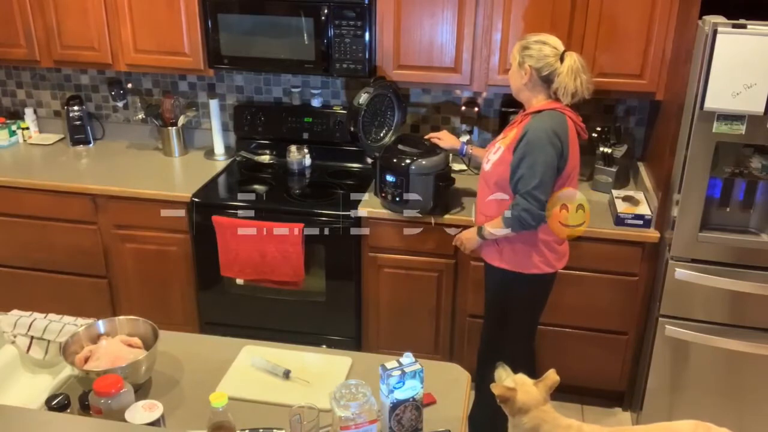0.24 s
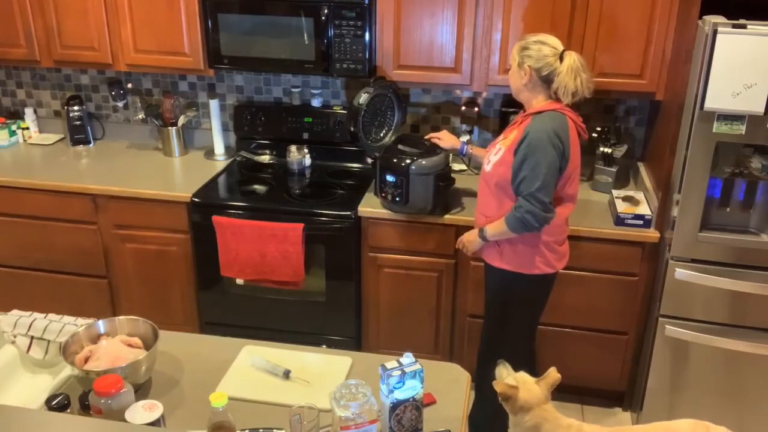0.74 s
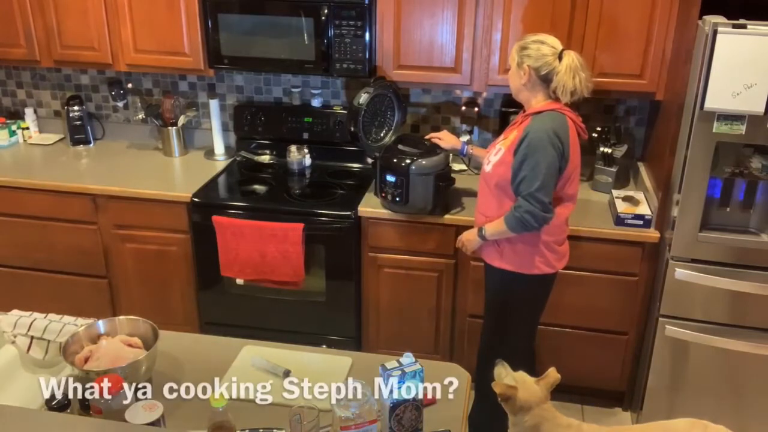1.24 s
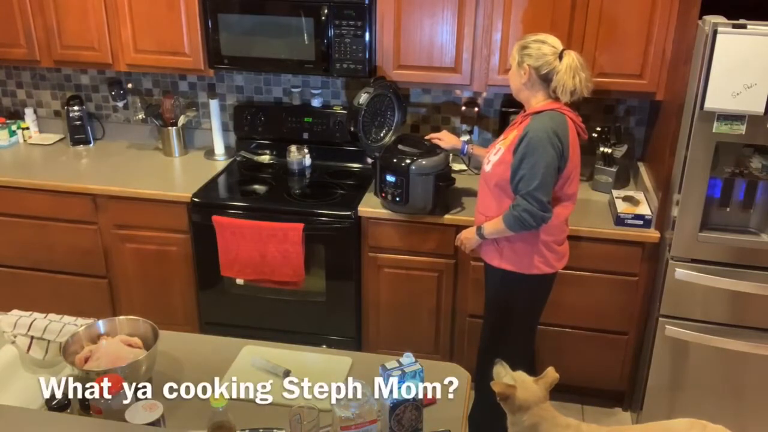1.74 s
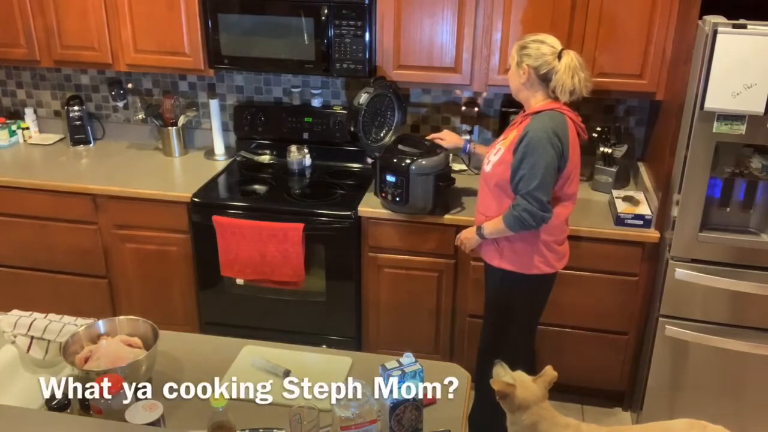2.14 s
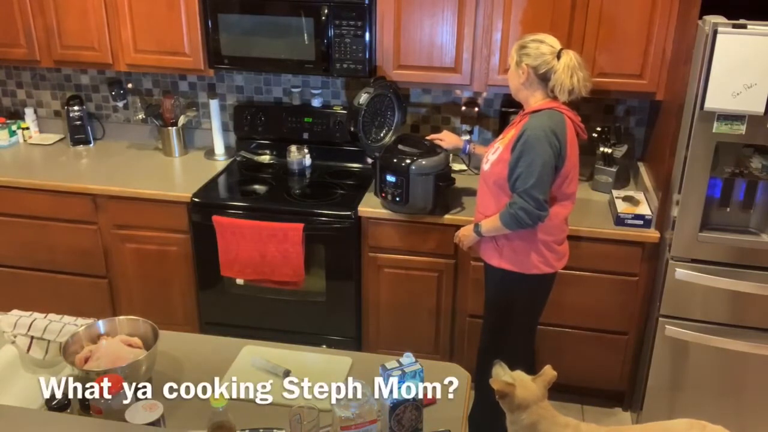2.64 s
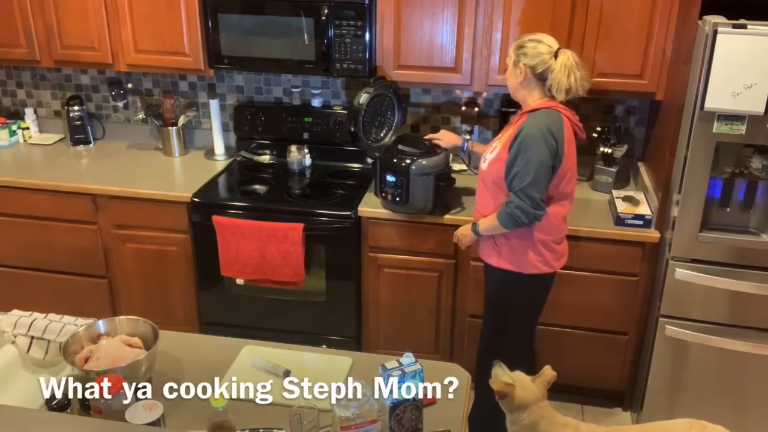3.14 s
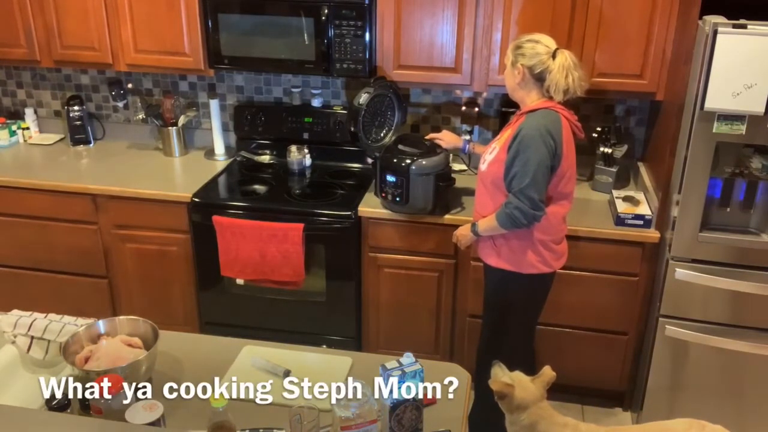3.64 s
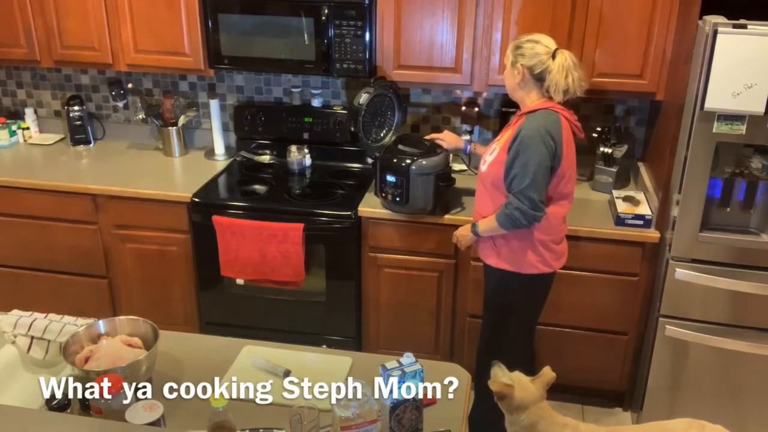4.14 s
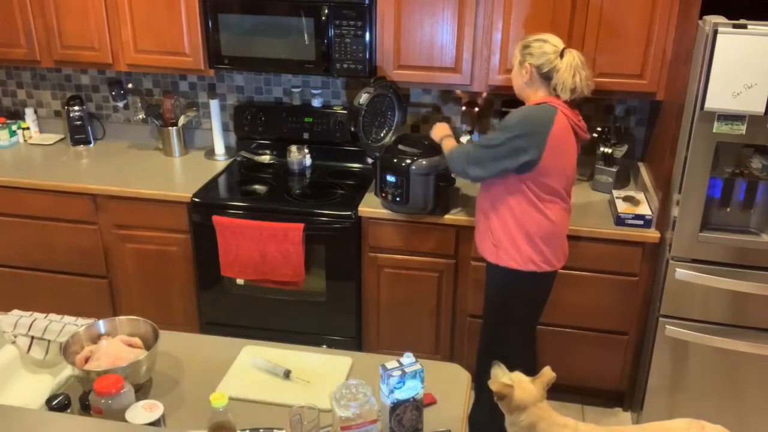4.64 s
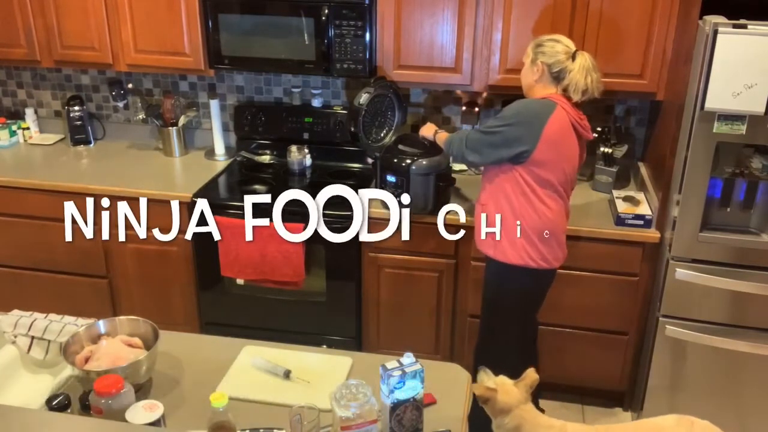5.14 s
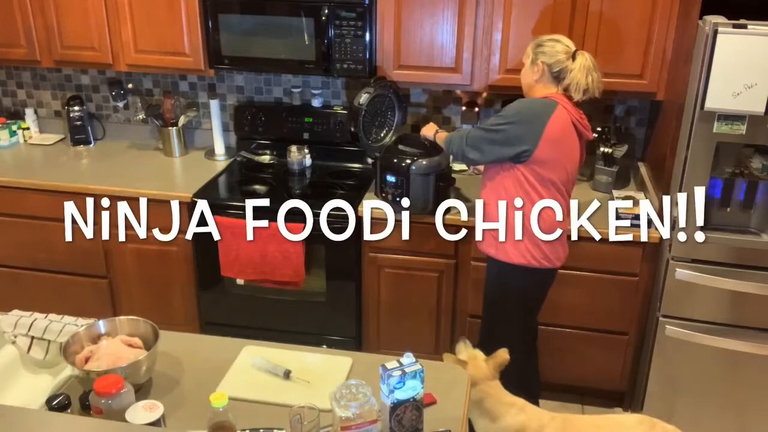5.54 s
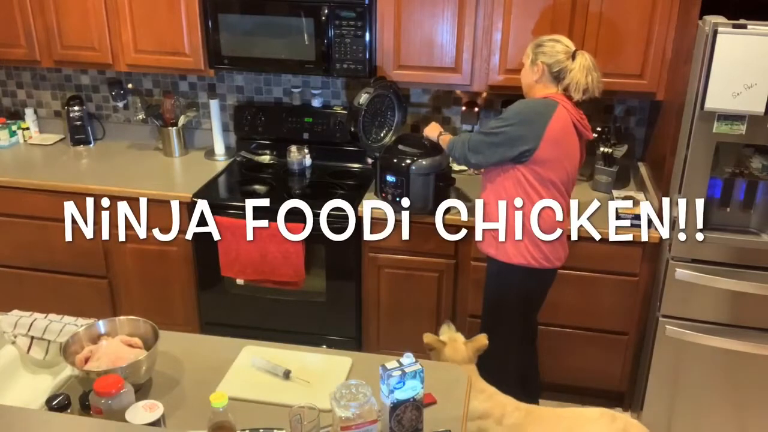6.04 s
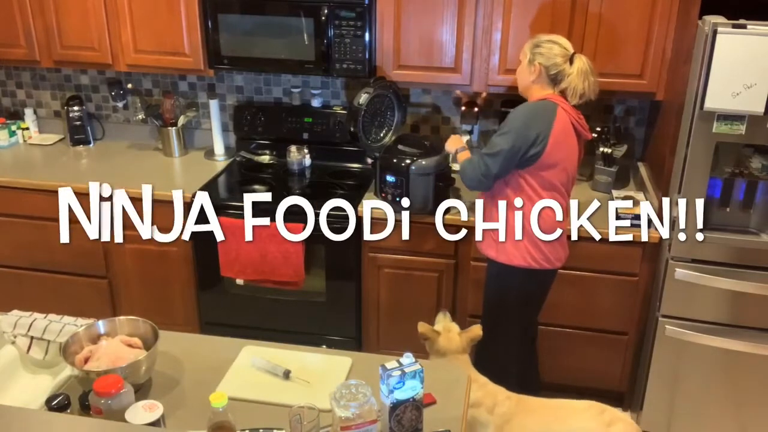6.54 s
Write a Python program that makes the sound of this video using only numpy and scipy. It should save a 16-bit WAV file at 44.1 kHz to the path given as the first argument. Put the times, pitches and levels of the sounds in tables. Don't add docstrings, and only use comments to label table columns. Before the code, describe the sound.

Steam jets from a cooker's valve in uneven bursts: one long, one short and strong, one weak puff, one firm and abruptly ended, then a pause and another long rush. The hiss is sharp, spitting and slightly whistling, with short echoes off tiles and cupboards. Faint low refrigerator hum fills the gaps, with soft foot thumps and cloth rustle; light paw knocks sit under the final burst. Heard from across the room by one microphone.

```python
import sys
import numpy as np
from scipy import signal
from scipy.fft import rfft, irfft, next_fast_len
from scipy.io import wavfile
from scipy.ndimage import uniform_filter1d, map_coordinates

SR = 44100
rng = np.random.default_rng(int(sys.argv[2]) if len(sys.argv) > 2 else 0)


def makeup_ratio(level_db):
    decades = np.asarray(level_db, float) / 20
    return 10 ** decades


def put_to_file(sound):
    columns = np.atleast_2d(sound).T
    safe = np.clip(columns, -1, 1)
    whole_steps = np.round(safe * 32767)
    wavfile.write(sys.argv[1], SR, whole_steps.astype(np.int16))


N = 298821
LEAD = SR // 2
TIME = np.arange(-LEAD, N) / SR

# start in seconds, opening time in seconds,
# held time in seconds, closing time in seconds, hiss level in dB.
PUSHES = [
    (-0.5, 0.062, 2.058, 0.037, -22),
    (1.966, 0.097, 0.19, .15, -20.5),
    (2.74, 0.059, 0.081, 0.069, -36.5),
    (3.203, .21, 0.68, 0.017, -23),
    (4.908, 0.041, .02, 0.34, -41),
    (5.189, 0.056, 1.6, .03, -23.5),
]
# time in seconds, extra flow in dB,
# throat song in dB relative to the hiss, throat pitch in Hz.
FINGER_LEAN = [(0, -0.5, -13, 2165), (.82, 0, -12.5, 2120), (.866, 1, -10, 2200), (.97, -1.9, -13, 2160),
               (1.33, -0.7, -17, 2060), (1.62, -1, -12.5, 2150), (2.05, -2.3, -10.5, 2270),
               (2.24, -0.8, -8.5, 2260), (3.6, 0, -12.5, 2250), (3.75, 1, -19.5, 1950),
               (4.02, 0.1, -16, 1940), (4.1, 1.8, -10.5, 2280), (5.15, -2.5, -10, 2230),
               (5.24, 3.5, -9.5, 2140), (5.31, -0.5, -12.5, 2090), (5.62, 0.3, -16.5, 2040),
               (5.9, 0, -13, 2250), (6.78, -1.1, -14, 2300)]
# frequency in Hz, level in dB per Hz.
HISS_COLOUR = [(1650, -34), (2800, -16.5), (3010, -12.5), (3480, -14.5), (4110, -15.5), (4970, -10),
               (6110, -1.5), (7210, -1), (9080, -0.5), (9860, -1), (11500, -11.5), (15000, -29.5),
               (22000, -120)]
# frequency in Hz, level in dB per Hz.
FIZZ_COLOUR = [(10000, -45), (11300, 14.5), (12400, 5.5), (13700, 14.5), (14800, 11.5), (15800, 14.5),
               (17000, -8.5)]
# frequency in Hz, level in dB per Hz.
LID_COLOUR = [(150, -53.5), (500, -21), (800, -4.5), (1000, -19), (1140, -15.5), (1250, 7), (1400, 1),
              (1600, -4.5), (2000, -18), (3000, -81.5)]
# frequency in Hz, width in Hz, lift in dB.
STANDING_WAVES = [(1242, 58, 6.5), (1540, 140, -6), (2045, 136, 3), (2320, 130, 2.5), (2567, 37, 7),
                  (2750, 130, -1.5), (3010, 70, 3.5), (4977, 160, 6), (5480, 91, 7), (5620, 130, -4),
                  (6354, 90, 7.5), (6480, 40, -1.5), (7035, 78, 9.5), (7520, 70, 5), (7400, 68, -2),
                  (7540, 45, 1), (8550, 43, -4), (9360, 30, 1.5), (9180, 300, -4.5), (9660, 120, 2),
                  (10040, 45, -1), (10360, 80, 0.5), (10290, 47.6, 7), (10660, 50, 8), (10820, 58, -1.5),
                  (12240, 65, 13.5), (12620, 207, -2), (13750, 85, 2), (14800, 100, 2.5)]
# frequency in Hz, time to fall by 60 dB in seconds.
ROOM_RING = [(1000, 0.58), (2200, 0.71), (4000, 0.58), (6500, 0.52), (10000, 0.35), (15000, 0.26)]
# frequency in Hz, rms level in dB.
HUM_TONES = [(120.0, -48), (240, -64), (300, -63.5), (360, -56.5), (420, -59.5), (480, -66), (660, -63.5),
             (900, -76.5), (1080, -70)]
# frequency in Hz, width in Hz, rms level in dB.
MOTOR_TONES = [(40, 18, -63.5), (194, 39, -60.5), (219.3, 7.9, -62.5), (344, 14, -73), (577, 17, -67)]
# frequency in Hz, level in dB per Hz.
AIR_COLOUR = [(20, -22.5), (30, -16), (60, -10), (95, -13.5), (150, -14.5), (230, -9.5), (420, -9),
              (680, -15.5), (900, -16.5), (2200, -26), (5000, -35), (7500, -41.5), (10300, -45),
              (11600, -56)]
# time in seconds, peak level in dB, brightest frequency in Hz, spread in Hz.
PAW_TAPS = [(5.626, -36, 760, 500), (5.64, -31.5, 450, 900), (5.701, -40, 600, 600), (5.739, -44, 250, 300),
            (5.855, -36.5, 483, 500), (5.895, -39, 400, 300), (5.966, -41, 260, 350),
            (5.995, -39, 400, 300), (5.92, -44, 400, 300), (6.065, -39.5, 600, 300), (6.09, -38, 594, 300),
            (6.11, -41, 395, 405)]
# frequency in Hz, level in dB, time to fall by 60 dB in seconds.
FLOORBOARDS = [(265, 0, .07), (400, -2, .09), (510, -6, .05), (620, 0, .09), (860, -3, .07)]
# time in seconds, level in dB, frequency in Hz.
FOOT_THUMPS = [
    (4.15, -47, 60),
    (4.21, -43, 50),
    (5.975, -43.5, 72),
]
# time in seconds, rms level in dB, spread in seconds.
SLEEVE_RUSTLES = [
    (4.46, -78, .01),
    (4.605, -70.5, 0.0093),
    (4.63, -77, 0.0086),
    (4.8, -81, 0.0092),
]
# time in seconds, lowest Hz, highest Hz.
SIDE_BURSTS = [(.45, 4200, 5300), (.45, 12400, 13900), (.775, 9600, 11200), (1.47, 4200, 6500),
               (1.565, 5100, 6500), (1.565, 8200, 10500), (1.565, 13000, 15300), (2.145, 8200, 9800),
               (2.145, 10300, 11900), (2.84, 6800, 8400), (3.93, 4200, 5300), (3.93, 8200, 10500),
               (3.93, 12400, 13900), (5.39, 14400, 15800), (5.42, 9600, 11200), (6.76, 8200, 11200),
               (6.76, 13800, 15800)]

AIR_DB = -53
HISS_DB = -80
TOP_HZ = 15700
FULL_DB, SONG_DB = -26.5, -13
SKIRT_DB, SKIRT_PER_SONG, SKIRT_PER_FLOW, SKIRT_WANDER_DB = -16, -0.21, 0.082, 2.2
FIZZ_DB, FIZZ_PER_SONG, FIZZ_PER_FLOW, FIZZ_WANDER_DB = -7.5, -.15, .12, 0.15
FLOW_WANDER_DB, SONG_WANDER_DB = 0.55, 1
SONG_PER_FLOW = 0.087
OPEN_CURVE = 1.17
REACH_S, REACH_DB = 5.25, 2
WEAK_HZ, WEAK_DULL = 6300, 0.17


def unit(x):
    return x / np.sqrt(np.mean(x ** 2) + 1e-20)


def along(points, hz):
    f, v = np.transpose(points)
    return np.interp(np.log(hz + 1), np.log(f + 1), v)


def filtered(x, response):
    m = next_fast_len(len(x) + 8192)
    return irfft(rfft(x, m) * response(np.fft.rfftfreq(m, 1 / SR)), m)[:len(x)]


def noise(response):
    return unit(filtered(rng.standard_normal(len(TIME)), response))


def bell(hz, centre_hz, width_hz):
    return 1 / np.sqrt(1 + (2 * (hz - centre_hz) / width_hz) ** 2)


def wander(rate):
    return map_coordinates(rng.standard_normal(256), [(TIME - TIME[0]) * rate])


def rush(gain, patchy_db):
    hz, t, z = signal.stft(rng.standard_normal(len(TIME)), SR, nperseg=512)
    patches = uniform_filter1d(rng.standard_normal(z.shape), size=6, axis=0)
    patches = uniform_filter1d(patches, size=9, axis=1)
    shape = gain(hz[:, None], t - LEAD / SR) + 0 * t
    shape = shape / np.sqrt(np.mean(shape ** 2, axis=0))
    z = z * shape * makeup_ratio(patchy_db * unit(patches))
    return unit(signal.istft(z, SR, nperseg=512)[1][:len(TIME)])


def valve():
    knot_s, *columns = np.transpose(FINGER_LEAN)
    extra_db, song_db, throat_hz = [np.interp(TIME, knot_s, c) for c in columns]
    ramp = lambda t, length: np.sin(np.pi / 2 * np.clip(t / length, 0, 1))
    flow = 0
    for start, rise, hold, fall, db in PUSHES:
        opening = ramp(TIME - start, rise) ** OPEN_CURVE
        closing = ramp(start + rise + hold + fall - TIME, fall) ** 2
        flow = flow + makeup_ratio(db) * opening * closing
    flow = flow * makeup_ratio(extra_db + FLOW_WANDER_DB * wander(7))
    weak_db = np.clip(20 * np.log10(flow + 1e-9) - FULL_DB, -24, 0)
    song_db = song_db + SONG_WANDER_DB * wander(22) + SONG_PER_FLOW * weak_db
    extra_song_db = song_db - SONG_DB
    skirt_db = SKIRT_DB + SKIRT_PER_SONG * extra_song_db + SKIRT_PER_FLOW * weak_db
    skirt_db = skirt_db + SKIRT_WANDER_DB * wander(6) + REACH_DB * (TIME > REACH_S)
    fizz_db = FIZZ_DB + FIZZ_PER_SONG * extra_song_db + FIZZ_PER_FLOW * weak_db
    fizz_db = fizz_db + FIZZ_WANDER_DB * wander(8)
    return flow, song_db, skirt_db, fizz_db, throat_hz


def steam():
    flow, song_db, skirt_db, fizz_db, throat_hz = valve()
    weak_db = np.clip(20 * np.log10(flow + 1e-9) + 24, -24, 0)
    at = lambda t, curve: np.interp(t, TIME, curve)

    def hiss_gain(hz, t):
        weak = at(t, weak_db)
        skirt = (at(t, skirt_db) + 16.5) * bell(hz, 4300, 1900) ** 2
        dip = 0.14 * weak * bell(hz, 4950, 900) ** 2
        dull = WEAK_DULL * weak * np.log2(np.maximum(hz / WEAK_HZ, 1))
        return makeup_ratio(along(HISS_COLOUR, hz) + skirt + dip + dull)

    def throat_gain(hz, t):
        width_hz = 900 * makeup_ratio(0.146 * at(t, weak_db))
        return bell(hz, at(t, throat_hz), width_hz) ** 2

    hiss = rush(hiss_gain, patchy_db=1.1)
    fizz = rush(lambda hz, t: makeup_ratio(along(FIZZ_COLOUR, hz)), patchy_db=.6)
    lid = rush(lambda hz, t: makeup_ratio(along(LID_COLOUR, hz)), patchy_db=.8)
    throat = rush(throat_gain, patchy_db=0.8)
    lid_db = -28 + 0.24 * (song_db + 11.0) + 0.1 * weak_db
    jet = hiss + makeup_ratio(fizz_db) * fizz + makeup_ratio(song_db) * throat + makeup_ratio(lid_db) * lid
    flutter = uniform_filter1d(rng.standard_normal(len(TIME)), size=120)
    return flow * jet * makeup_ratio(0.95 * unit(flutter))


def scrambled(x, keep=lambda hz, t: 1):
    hz, t, z = signal.stft(x, SR, nperseg=256)
    z = z * np.exp(2j * np.pi * rng.random(z.shape)) * keep(hz[:, None], t)
    return np.sqrt(2) * signal.istft(z, SR, nperseg=256)[1][:len(x)]


def tail():
    hz, t, z = signal.stft(rng.standard_normal(SR), SR, nperseg=256)
    ring_s = np.clip(along(ROOM_RING, hz), .05, 2)
    fall = makeup_ratio(-60 * t / ring_s[:, None])
    answer = rfft(signal.istft(z * fall, SR, nperseg=256)[1])
    power = np.abs(uniform_filter1d(np.abs(answer) ** 2, size=160))
    answer /= np.sqrt(power + 1e-20)
    return np.pad(irfft(answer)[:SR * 3 // 4], (200, 0))


def kitchen(x, direct, plume):
    lift_db = lambda f: sum(db * bell(f, centre, width) ** 2 for centre, width, db in STANDING_WAVES)
    nozzle = filtered(x, lambda f: makeup_ratio(lift_db(f)))
    parts = np.sqrt(1 - plume) * nozzle, np.sqrt(plume) * scrambled(nozzle)
    room = sum(signal.fftconvolve(part, tail())[:len(x)] for part in parts)
    return np.sqrt(direct) * nozzle + np.sqrt(1 - direct) * room


def fridge():
    out = np.zeros(len(TIME))
    for hz, db in HUM_TONES:
        out += np.sqrt(2) * makeup_ratio(db) * np.sin(2 * np.pi * (hz * TIME + rng.random()))
    for hz, width_hz, db in MOTOR_TONES:
        out += makeup_ratio(db) * noise(lambda f: bell(f, hz, width_hz) ** 2)
    return out + makeup_ratio(AIR_DB) * noise(lambda f: makeup_ratio(along(AIR_COLOUR, f)))


def floor_knocks():
    out, t = np.zeros(len(TIME) + SR), np.arange(SR // 4) / SR
    for s, db, hz in FOOT_THUMPS:
        thump = makeup_ratio(db - 60 * t / 0.27) * np.sin(2 * np.pi * hz * t) * (1 - np.exp(-t / 0.01))
        out[LEAD + round(s * SR):][:len(t)] += thump
    for s, db, bright_hz, spread_hz in PAW_TAPS:
        scuff = filtered(rng.standard_normal(len(t)), lambda f: bell(f, bright_hz, spread_hz) ** 2 * (f < 950))
        scuff = makeup_ratio(-60 * t / 0.23) * unit(scuff)
        ring = 0
        for hz, level, t60 in FLOORBOARDS:
            tone = np.sin(2 * np.pi * (hz * rng.normal(1, 0.033) * t + rng.random()))
            ring = ring + makeup_ratio(level - 60 * t / t60) * bell(hz, bright_hz, spread_hz) * tone
        soft_start = 1 - np.exp(-t / 0.007)
        out[LEAD + round(s * SR):][:len(t)] += makeup_ratio(db + 1) * (ring + 0.52 * scuff) * soft_start
    return out[:len(TIME)]


def sleeve():
    cloth = noise(lambda f: bell(f, 10000, 3500) ** 2)
    swells = sum(makeup_ratio(db) * np.exp(-.5 * ((TIME - s) / spread) ** 2) for s, db, spread in SLEEVE_RUSTLES)
    return cloth * swells


def scene():
    steps = floor_knocks() + sleeve()
    vent = makeup_ratio(-1.0) * kitchen(steam(), direct=0.29, plume=.25)
    hum = fridge()
    steps_room = makeup_ratio(-5.5) * signal.fftconvolve(steps, tail())[:len(TIME)]
    mono = vent + hum + steps + steps_room
    return np.tile(mono[LEAD:], (2, 1))


def roll_off(x):
    return signal.sosfilt(signal.butter(12, 16660, fs=SR, output="sos"), x)


def record(dry):
    hiss = unit(filtered(rng.standard_normal(N), lambda f: bell(f, 15000, 5000) ** 2))
    noisy = dry[0] + makeup_ratio(HISS_DB) * hiss
    mono = filtered(noisy, lambda f: np.cos(np.pi / 2 * np.clip((f - TOP_HZ) / 120, 0, 1)) ** 2)

    def apart(hz, t):
        gain = 0
        for s, low_hz, high_hz in SIDE_BURSTS:
            in_band = (hz > low_hz + 150) * (hz < high_hz - 150)
            gain = gain + in_band * np.clip(1 - ((t - s) / 0.019) ** 2, 0, 1)
        return gain

    side = makeup_ratio(-2.5) * scrambled(mono, apart)
    return roll_off(np.array([mono + side, mono - side]))


dry = scene()
out = record(dry)
put_to_file(out)
```